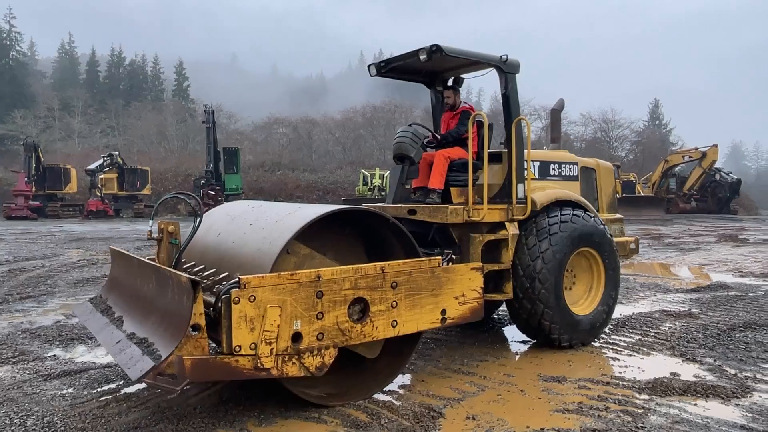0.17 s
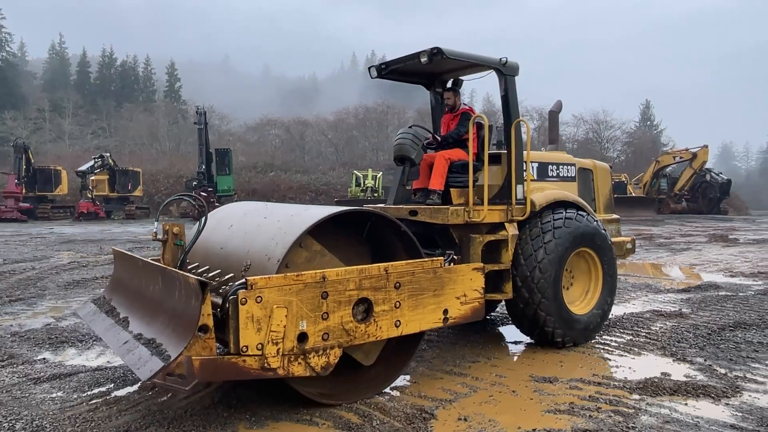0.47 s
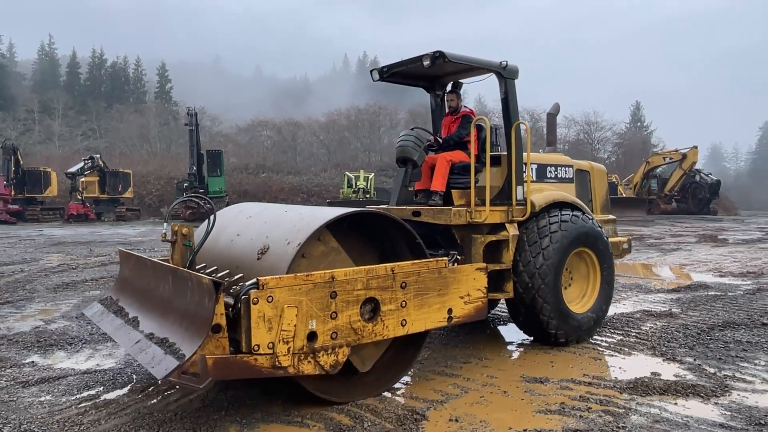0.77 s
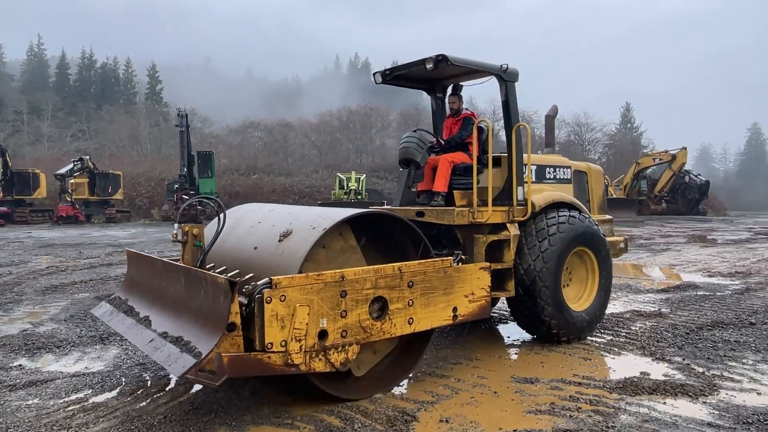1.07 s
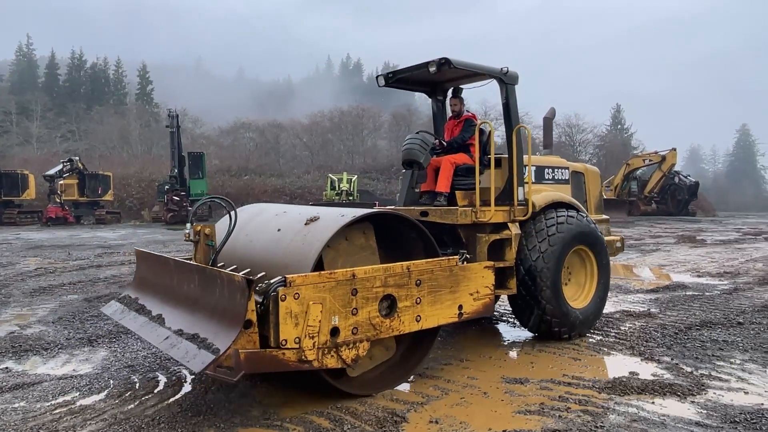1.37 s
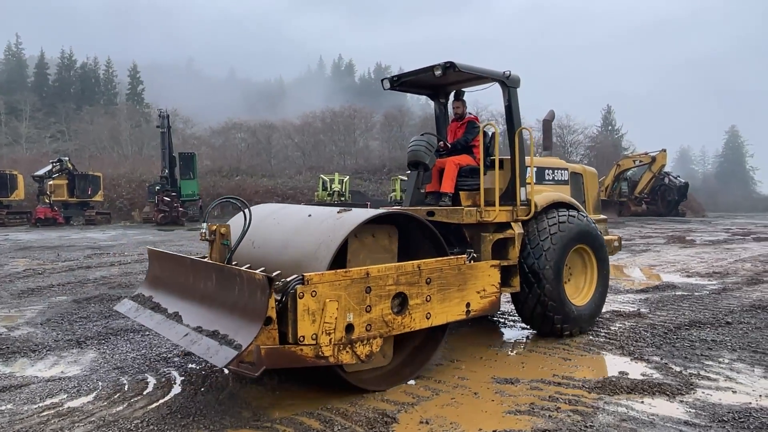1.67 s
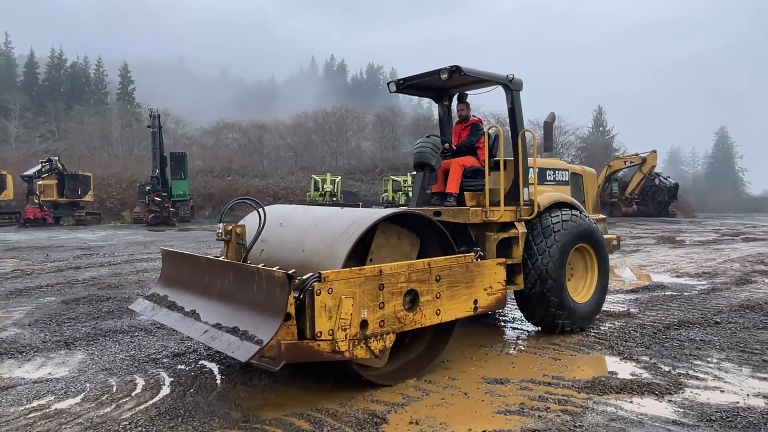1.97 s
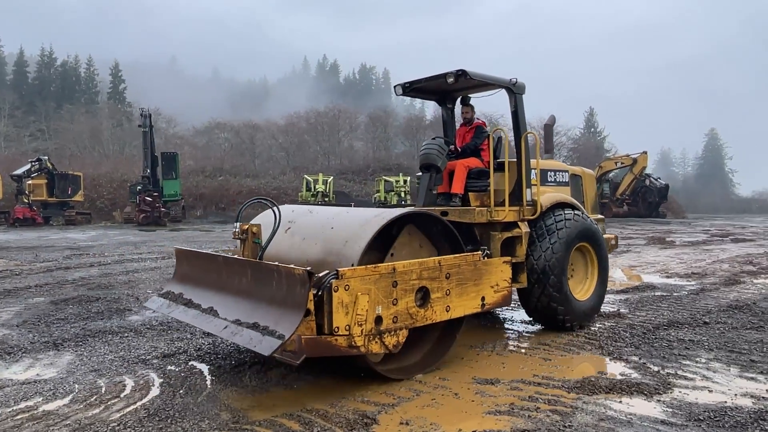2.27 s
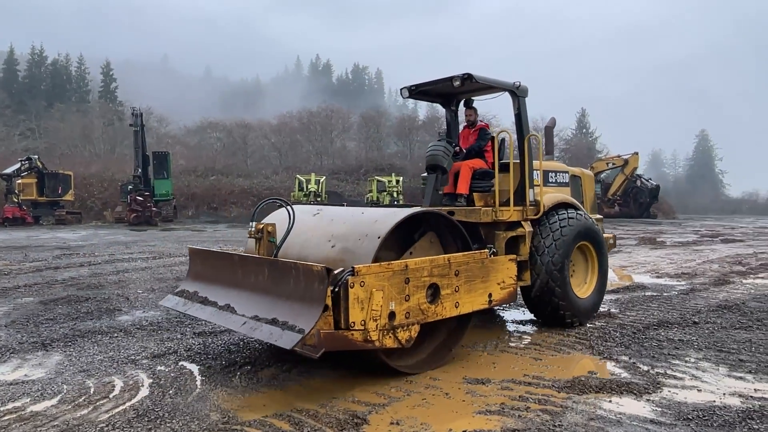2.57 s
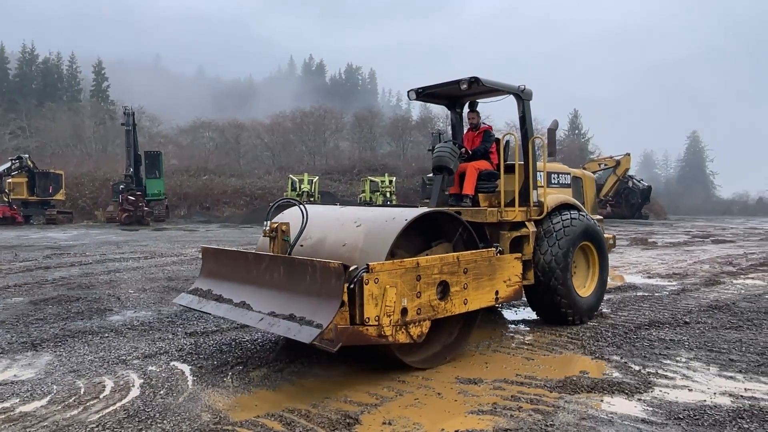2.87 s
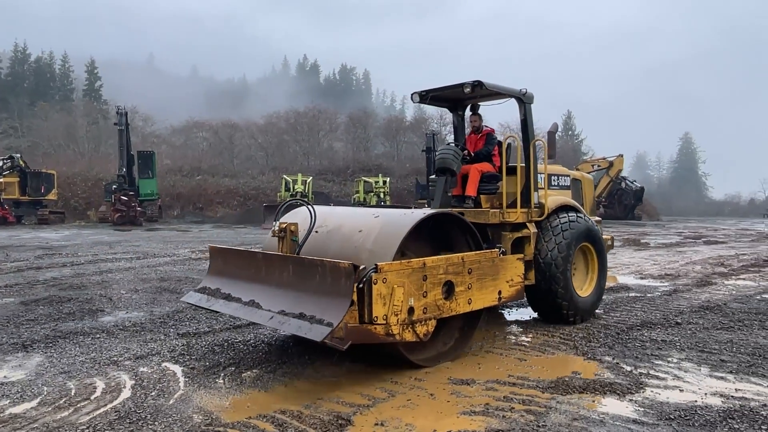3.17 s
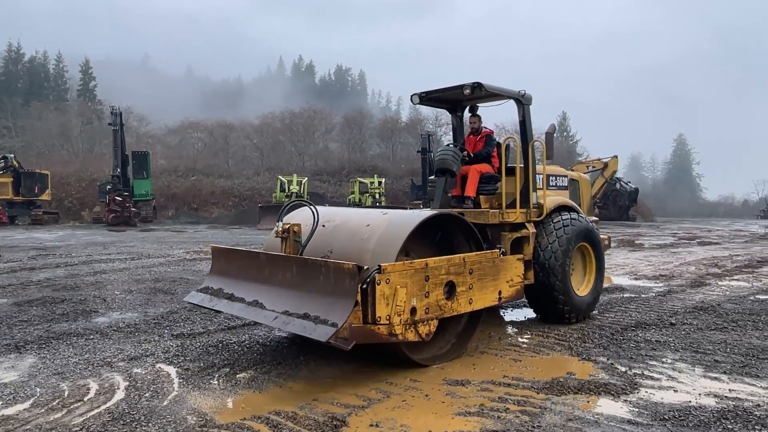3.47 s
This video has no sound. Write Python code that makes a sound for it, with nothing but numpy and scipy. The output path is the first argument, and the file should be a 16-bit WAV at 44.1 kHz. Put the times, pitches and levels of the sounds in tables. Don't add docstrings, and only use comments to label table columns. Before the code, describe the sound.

A heavy diesel roller cuts in abruptly at about 0.1 s, its low exhaust drone and metallic engine clatter steady. Until about 2 s its hollow steel drum grinds gravel with dense hiss and crackle, ringing knocks and bright stone splits, strongest around 1.2-1.9 s. From about 2.6 s the crushing eases, knocks grow sparser and the drone weakens, continuing to 3.6 s. Open yard, close stereo phone pickup.

```python
import sys
import numpy as np
from scipy import signal
from scipy.fft import rfft, irfft
from scipy.io import wavfile
from scipy.ndimage import uniform_filter1d

SR = 44100
rng = np.random.default_rng(int(sys.argv[2]) if len(sys.argv) > 2 else 0)


def level_to_linear(level):
    exponent = np.asarray(level, float) / 20
    return 10 ** exponent


def master(y):
    cut = np.clip(np.atleast_2d(y).T, -1, 1)
    pcm = np.round(cut * 32767)
    wavfile.write(sys.argv[1], SR, pcm.astype(np.int16))


N = 159201
T = np.arange(N) / SR
HZ = np.arange(N // 2 + 1) * SR / N + 1

# (time [s], firing rate [Hz], drone level [dB])
ENGINE_COURSE = [(.08, 57.44, -11.5), (.3, 57.83, -11.6), (.55, 56.73, -11.5), (.8, 56.8, -11.2),
                 (1.05, 57.1, -11.6), (1.3, 56.17, -11.3), (1.55, 55.74, -11.2), (1.8, 56.52, -11.5),
                 (2.05, 56.83, -12), (2.3, 56.35, -11.8), (2.55, 57.33, -12.1), (2.8, 58.22, -13),
                 (3.05, 59.51, -14.4), (3.2, 59.83, -15.5), (3.4, 59.61, -15.4), (3.61, 57.84, -14.9)]
# (frequency [Hz], density [dB per Hz])
STONE_SPECTRUM = [(150, -10), (350, -1.5), (750, -2.5), (1500, -5.5), (2600, -11), (4500, -25.5),
                  (7500, -28.5), (14500, -35.5)]


def curve(table, col, at=T):
    return np.interp(at, np.array(table)[:, 0], np.array(table)[:, col])


def over_hz(table, col, hz=HZ):
    return np.interp(np.log(hz), np.log(np.array(table)[:, 0]), np.array(table)[:, col])


def level(x, db):
    return x * level_to_linear(db) / np.sqrt(np.mean(x ** 2))


def noise():
    return rng.standard_normal((2, N))


def walk(rate_hz):
    k = int(SR / rate_hz)
    held = np.repeat(rng.standard_normal(N // k + 1), k)
    return 1.3 * uniform_filter1d(uniform_filter1d(held, k), k)[:N]


def ring(x, hz, t60_s):
    r = np.exp(-np.log(1000) / (max(t60_s, .0003) * SR))
    return signal.lfilter([1 - r, 0, r - 1], [1, -2 * r * np.cos(2 * np.pi * hz / SR), r * r], x, axis=-1)


def burst(start_s, length_s, rise_s):
    u = np.clip(T - start_s, 0, None)
    return (1 - np.exp(-u / rise_s)) * np.exp(-u / max(length_s, .002))


def firing_phase():
    return 2 * np.pi * np.cumsum(curve(ENGINE_COURSE, 1)) / SR


def engine():
    # (multiple of firing rate, level [dB], unsteadiness [dB])
    orders = [(1, 0, 0.07), (2, -22.5, 1.5), (3, -11.2, 0.25), (4, -27, 5.5)]
    # (frequency [Hz], density [dB per Hz])
    rumble_spectrum = [(25, -23), (40, -21), (60, -7), (90, -12), (135, -9), (185, -2), (225, -4.5),
                       (500, -19)]
    crank_rad, overtone_lag_rad = 4.61, 1.0
    overtone_fade, crank_wobble_rad_per_db = 0.57, .08
    phase = firing_phase() + crank_rad
    db = curve(ENGINE_COURSE, 2)
    fade_db = db - db[0]
    drone = 0
    for k, order_db, unsteady_db in orders:
        gain_db = db[0] + order_db + fade_db * (1 if k == 1 else overtone_fade) + unsteady_db * walk(14)
        wobble = crank_wobble_rad_per_db * unsteady_db * walk(7.9)
        drone = drone + level_to_linear(gain_db) * np.sqrt(2) * np.cos(k * phase - (k > 1) * overtone_lag_rad + wobble)
    out = level(irfft(rfft(noise()) * level_to_linear(over_hz(rumble_spectrum, 1)) * (HZ < 600), N), -29)
    out[0] += drone
    return out


def clatter():
    # (frequency [Hz], level [dB], t60 [s])
    block = [(700, 0.5, 0.018), (870, -3, 0.0093), (1006, -0.5, 0.0069), (1352, 3, 0.012),
             (2200, -8, 0.0018), (2380, -19, 0.0063), (3480, -13.5, 0.026), (3950, -41, .03),
             (4700, -10, 0.04), (5020, -9, 0.03)]
    clatter_db, fade_ratio = -18, 1.8
    rattle_db, rattles_per_s = 3, 150
    db = curve(ENGINE_COURSE, 2)
    pulse = 1 + 0.1 * np.cos(firing_phase())
    rattle = level_to_linear(rattle_db * walk(rattles_per_s))
    out = 0
    for hz, mode_db, t60_s in block:
        mode = level(ring(rattle * noise(), hz, t60_s), mode_db)
        out = out + mode * level_to_linear(walk(9.32) + 1.5 * (hz > 3000) * walk(3))
    return level(out, clatter_db) * pulse * level_to_linear(db[0] + fade_ratio * (db - db[0]))


def grit():
    grains_per_s, crack_share = 3300, 0.26
    spread_db, size_cap = 2.2, 3.5
    size_db = spread_db * np.minimum(rng.exponential(size=(2, N)), size_cap)
    cracks = (rng.random((2, N)) < grains_per_s / SR) * level_to_linear(size_db)
    cracks = ring(cracks * noise(), 4350, 0.00092)
    return np.sqrt(crack_share) * level(cracks, 0) + np.sqrt(1 - crack_share) * noise()


def splits():
    # (time [s], peak [dB], pitch [Hz], length [s])
    split_events = [(0.442, -41, 11600, 0.0069), (0.453, -36, 4200, .02), (0.758, -31.5, 8600, 0.022),
                    (0.997, -32, 3980, 0.01), (1.275, -34, 4000, 0.015), (1.355, -31, 4440, 0.031),
                    (1.389, -30.5, 6260, 0.054), (1.737, -30.5, 2990, 0.092), (1.951, -33, 4240, .012),
                    (2.437, -34, 2700, .02), (2.088, -38, 9040, 0.021), (2.498, -47, 11600, 0.0067),
                    (2.779, -37, 3800, 0.0072), (2.814, -36, 4500, 0.04), (3.063, -38.5, 5000, 0.068),
                    (3.287, -39, 12200, 0.0072)]
    width_oct, click_gain = 0.83, 6.5
    spectrum, out = rfft(grit()), 0
    for s, db, hz, length_s in split_events:
        width = width_oct * min(length_s / 0.035, 1)
        shape = np.exp(-.5 * (np.log2(HZ / hz) / width) ** 2)
        click = irfft(shape * np.exp(-2j * np.pi * (HZ - 1) * (s + 0.000986)), N)
        out = out + level(irfft(spectrum * shape, N), db) * burst(s, length_s, 0.00061)
        out[0] += click_gain * level_to_linear(db) * click / click.max() * (length_s < .012)
    return out


def stones(load_db, swell_db):
    stones_db, flicker_db = -4, 1.92
    ripple_db, ripple_hz = 1.8, 28
    k = int(ripple_hz * N / SR)
    ripple = uniform_filter1d(uniform_filter1d(rng.standard_normal(len(HZ)), k), k)
    spectrum = rfft(grit()) * level_to_linear(over_hz(STONE_SPECTRUM, 1) + ripple_db * ripple / ripple.std())
    out = 0
    for hz in 150 * 2. ** np.arange(8):
        octave = np.cos(np.pi / 2 * np.clip(np.log2(HZ / hz), -1, 1)) ** 2
        out = out + irfft(spectrum * octave, N) * level_to_linear(flicker_db * walk(12) + swell_db)
    return level(out, stones_db) * level_to_linear(load_db)


def drum(load_db, swell_db):
    # (frequency [Hz], level [dB], t60 [s])
    shell_modes = [(212, -6, .25), (228, -2, .28), (321, -5, .22), (469, -11, .14), (555, -10.5, .16),
                   (650, -11, .1), (722, -6, .16), (785, -8.5, .12), (931, -10, .19), (1028, -11.5, .12),
                   (1401, -9, .18), (1564, -11, .17), (2110, -14.5, .14), (4140, -18.5, .05)]
    # (time [s], peak [dB], favoured mode [Hz], length [s])
    knock_events = [(0.084, -7.5, 890, 0.052), (0.48, -9, 1000, 0.022), (0.51, -9.5, 324, 0.021),
                    (0.859, -9, 784, 0.017), (0.93, -12, 246, 0.13), (1.005, -8, 800, 0.042),
                    (1.066, -13, 660, 0.037), (1.083, -12, 290, 0.02), (1.07, -8, 1040, .04),
                    (1.174, -12, 920, 0.024), (1.255, -2, 764, 0.036), (1.358, -10, 700, 0.031),
                    (1.395, -2.5, 460, 0.035), (1.17, -13, 670, 0.022), (1.5, -12, 590, .02),
                    (1.295, -12.5, 330, 0.058), (1.6, -13, 2110, 0.03), (1.52, -5, 590, 0.024),
                    (1.634, -9.5, 780, 0.013), (1.683, -6.5, 570, 0.11), (1.76, -11, 750, 0.033),
                    (1.81, -8.5, 225, 0.12), (1.907, -2, 470, 0.042), (1.96, -16, 670, 0.096),
                    (2.035, -19, 590, 0.047), (2.086, -8.5, 850, 0.031), (2.2, -20.5, 680, 0.15),
                    (3.0, -13.5, 430, .15), (2.165, -10, 229, 0.023), (2.414, -5, 310, 0.026),
                    (2.684, -13, 820, 0.028), (2.73, -23, 580, .04), (2.862, -18, 640, .09),
                    (3.4, -17, 610, 0.045), (2.443, -13, 760, 0.028), (2.536, -12, 210, 0.19),
                    (2.824, -10, 920, 0.04), (3.076, -13, 690, 0.045), (3.142, -15, 590, 0.069),
                    (3.209, -14.5, 500, 0.046), (1.34, -12, 230, 0.15), (2.0, -13, 223, 0.16),
                    (2.75, -14.5, 220, 0.14), (2.74, -19, 322, 0.088), (2.27, -11.5, 376, .1),
                    (1.7, -20, 321, 0.077), (.12, -17, 1450, 0.088), (3.284, -23, 820, .03),
                    (1.78, -8, 1900, 0.028)]
    drum_db, wander_db, rock_s = -0.5, 1.6, .0012
    knock_db, rise_s, strike_db = -13.5, .003, 11
    grind_gain, near_oct = 3.44, .22
    thud_db, thud_hz = -2.5, 2660
    s, peak_db, pitch_hz, _ = np.array(knock_events).T
    hits = np.array([burst(at_s, length_s, rise_s) * level_to_linear(db + knock_db)
                     for at_s, db, _, length_s in knock_events])
    strike_at = ((s + rise_s) * SR).astype(int)
    out = 0
    for hz, db, t60_s in shell_modes:
        near = np.exp(-.5 * (np.log2(hz / pitch_hz) / near_oct) ** 2)
        rolling = level_to_linear(load_db + swell_db + drum_db + wander_db * walk(6.7))
        push = noise() * (rolling + grind_gain * near @ hits)
        push[0, strike_at] += near * level_to_linear(peak_db + knock_db + strike_db + 30)
        rocked = T - rock_s * walk(4)
        mode = np.array([np.interp(rocked, T, c) for c in ring(push, hz, t60_s)])
        out = out + mode * level_to_linear(db) * np.sqrt(t60_s * SR / 14)
    thud = irfft(rfft(noise()) * level_to_linear(over_hz(STONE_SPECTRUM, 1)) / (1 + (HZ / thud_hz) ** 2), N)
    return 0.5 * out + level(thud, thud_db) * hits.sum(0)


def scene():
    # (time [s], crushing load [dB])
    crushing_load = [(.08, -22), (.3, -21.5), (.6, -21), (.9, -18.5), (1.1, -20), (1.4, -19), (1.7, -20.5),
                     (2.0, -22), (2.3, -22.5), (2.6, -22), (2.95, -27), (3.2, -27), (3.35, -23),
                     (3.5, -28.5), (3.61, -24)]
    # (frequency [Hz], likeness [0-1], left lead [rad], left minus right [dB])
    ports = [(330, .99, .2, 0), (430, .93, .75, 1.2), (600, .87, .6, 4.7), (1050, .9, .5, 3.8),
             (1250, .62, .8, 5.5), (1900, .5, 0, .2), (2600, .58, .9, 1.5), (3400, .5, 2.3, 2.5),
             (4100, .35, 6.2, 3), (4600, .42, 9.4, 3), (5200, .35, 9.4, 4), (5800, .42, 12.6, 4.5),
             (8300, .85, 9.4, 0), (11000, .7, 6.4, 0)]
    ground_s, ground_drift_s_per_s, ground_db = .00167, .000035, -7.5
    load_db = curve(crushing_load, 1)
    swell_db = .6 * (walk(3.68) + 2.0 * walk(25.66))
    mix = engine() + clatter() + splits() + stones(load_db, swell_db) + drum(load_db, swell_db)
    direct, scattered = rfft(mix)
    bounce = irfft(direct * level_to_linear(ground_db) / (1 + (850 / HZ) ** 4) / (1 + (HZ / 3500) ** 4), N)
    direct = direct - rfft(np.interp(T - ground_s - ground_drift_s_per_s * T, T, bounce))
    like = np.clip(over_hz(ports, 1), 0, 1)
    like = np.where(HZ < 200, 1 - (1 - like) * (HZ / 200) ** 2, like)
    lead_rad = over_hz(ports, 2) * np.minimum(HZ / 200, 1) ** 1.75
    tilt = level_to_linear(over_hz(ports, 3) / 2) * np.exp(.5j * lead_rad)
    a, b = direct * np.sqrt((1 + like) / 2), scattered * np.sqrt((1 - like) / 2)
    return irfft(np.array([(a + b) * tilt, (a - b) / tilt]), N)


def thin_bands(bands, edge_hz):
    depth = sum(np.clip(np.minimum(HZ - lo, hi - HZ) / edge_hz, 0, 1) for lo, hi in bands)
    return level_to_linear(-17 * depth)


def roll_off(x):
    return signal.sosfilt(signal.butter(12, 15740, fs=SR, output="sos"), x)


def record(dry):
    # (from [Hz], to [Hz])
    empty_mid = [(7450, 9100), (13700, 30000)]
    empty_side = [(10350, 12900), (14500, 30000)]
    start_s, limit, mid_roll_hz = .0823, 1.06, 12600
    on = np.clip((T - start_s) / .0004, 0, 1)
    left, right = rfft(dry * on / (1 + (dry / limit) ** 4) ** 0.25)
    mid = (left + right) / 2 * thin_bands(empty_mid, 450) / np.sqrt(1 + (HZ / mid_roll_hz) ** 30)
    side = (left - right) / 2 * thin_bands(empty_side, 1600)
    return roll_off(irfft(np.array([mid + side, mid - side]), N) * on)


dry = scene()
out = record(dry)
master(out)
```